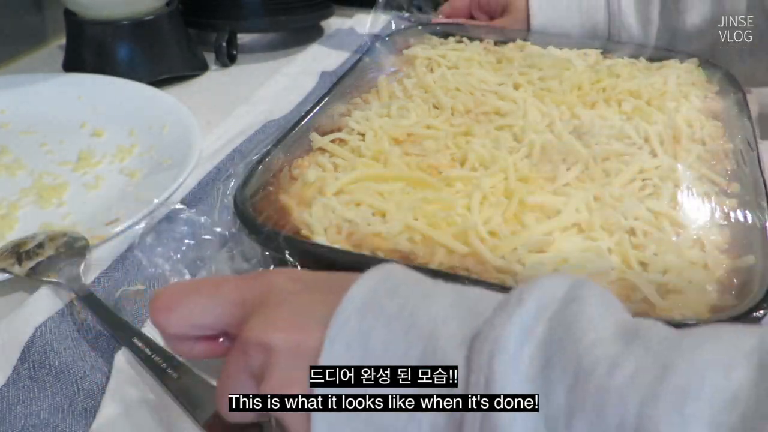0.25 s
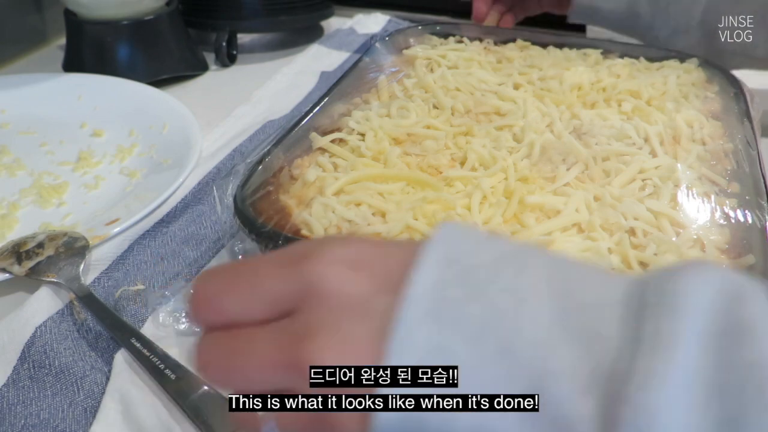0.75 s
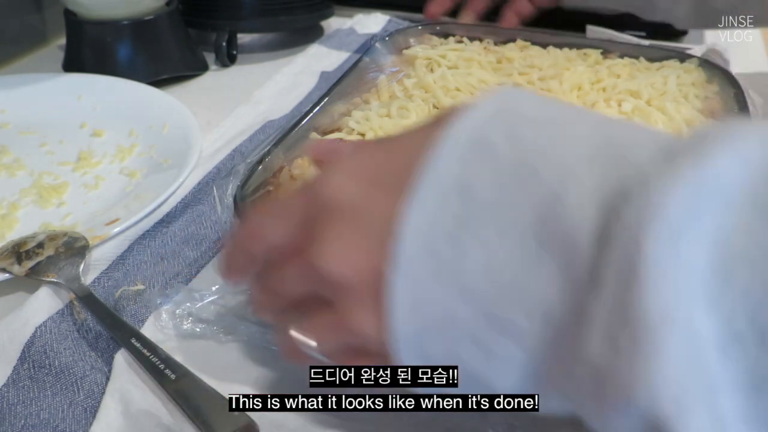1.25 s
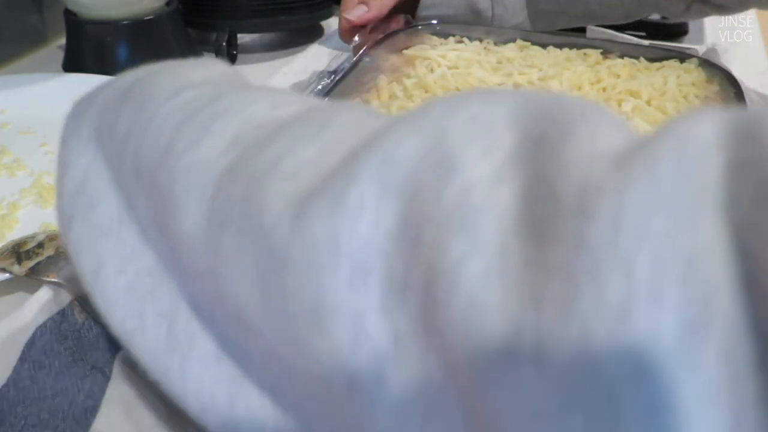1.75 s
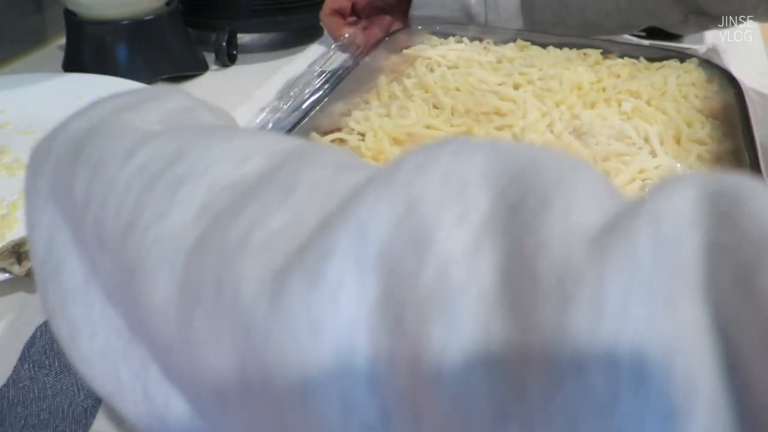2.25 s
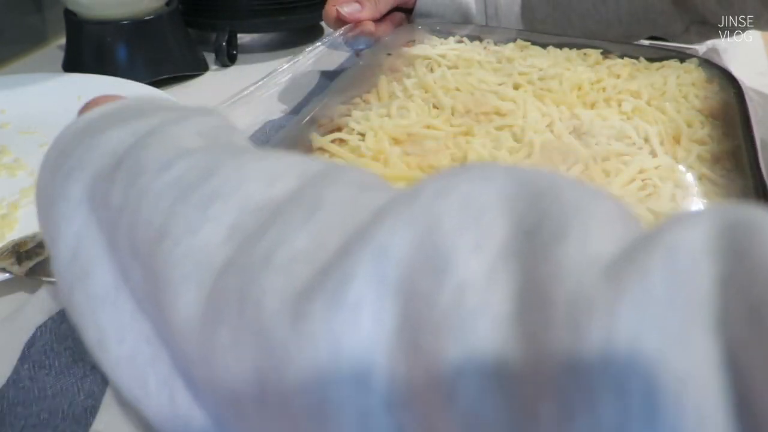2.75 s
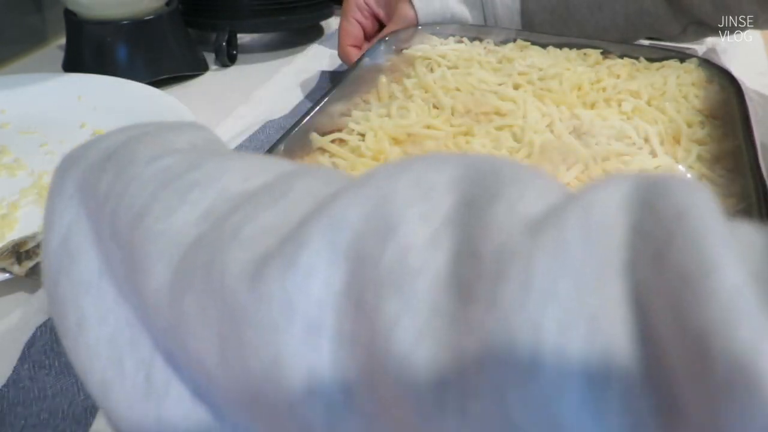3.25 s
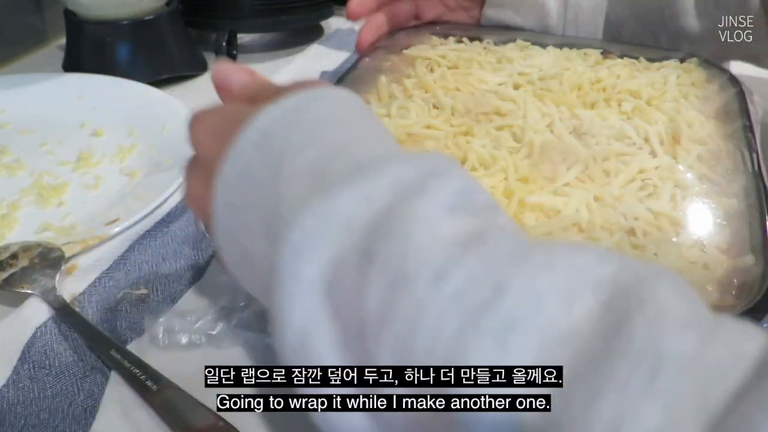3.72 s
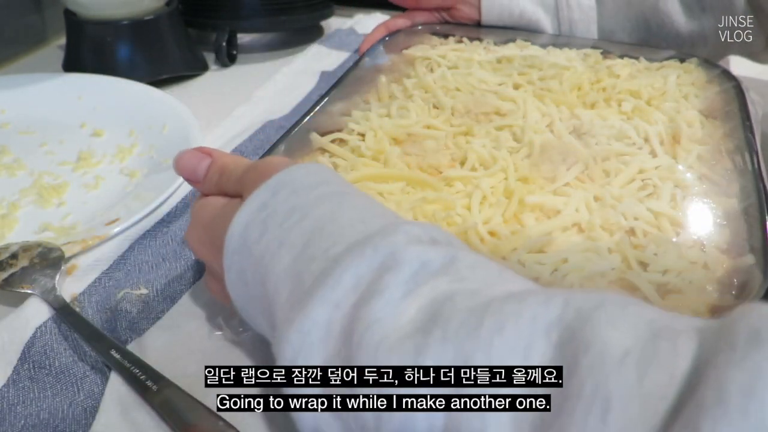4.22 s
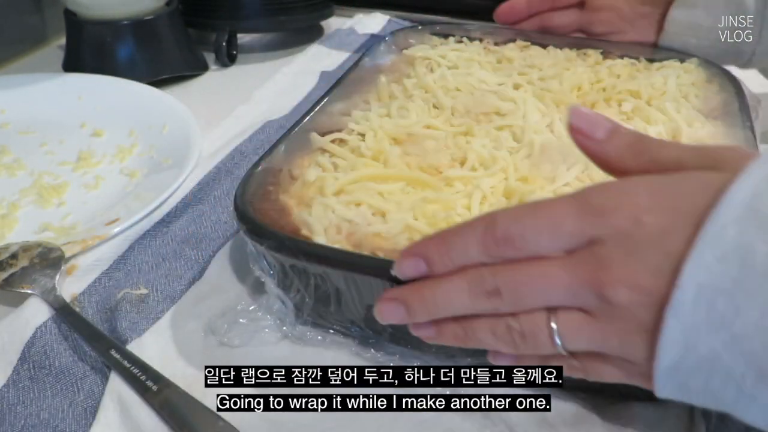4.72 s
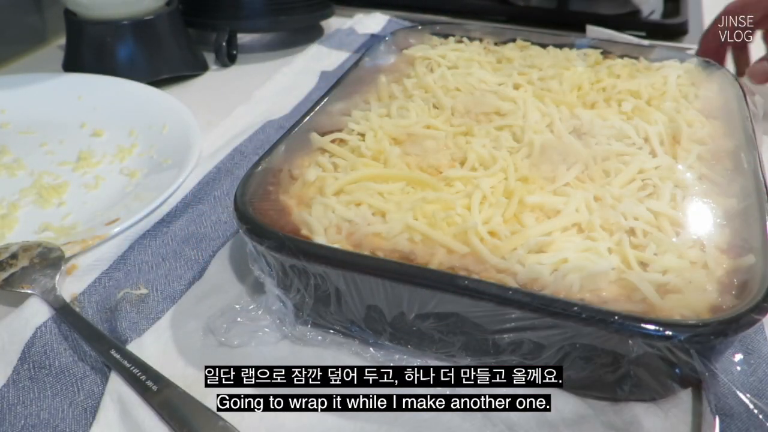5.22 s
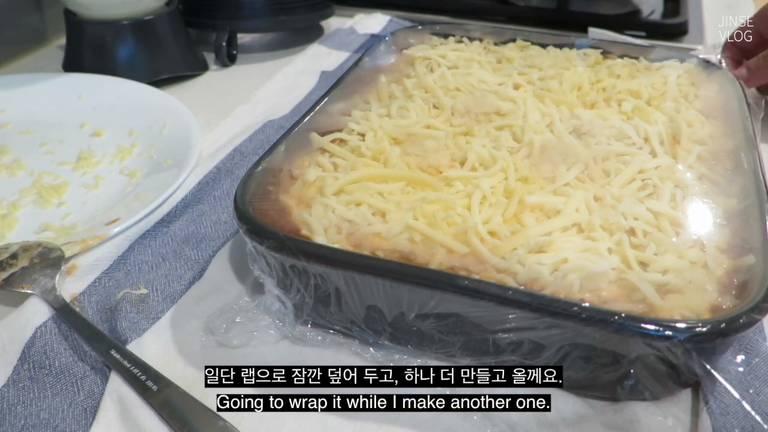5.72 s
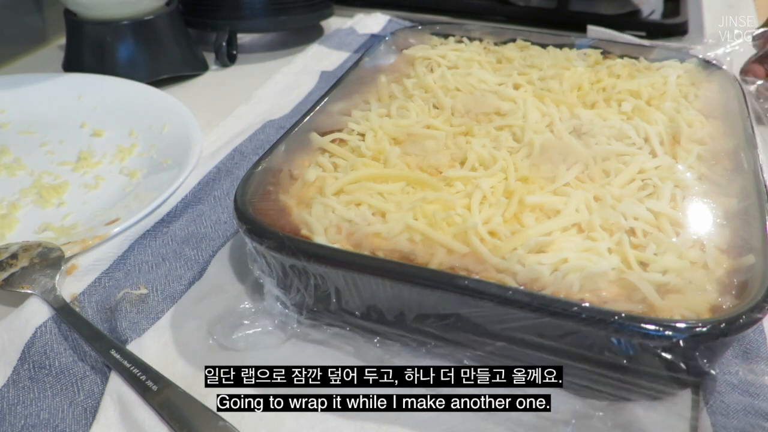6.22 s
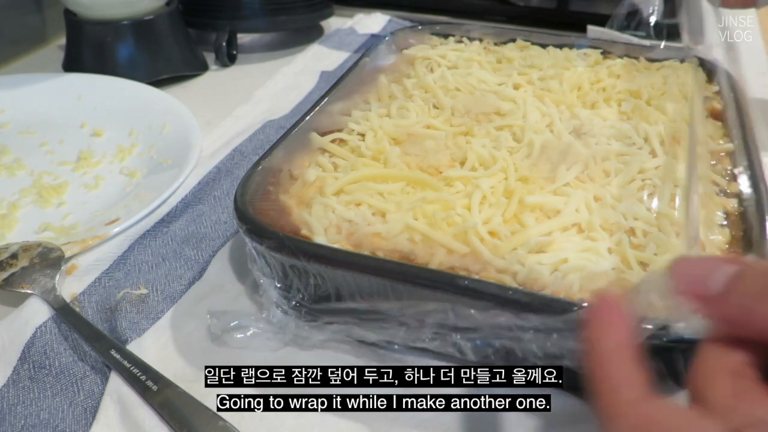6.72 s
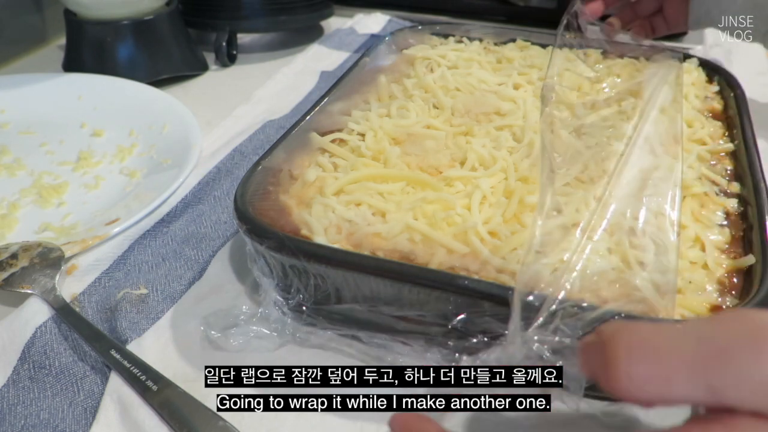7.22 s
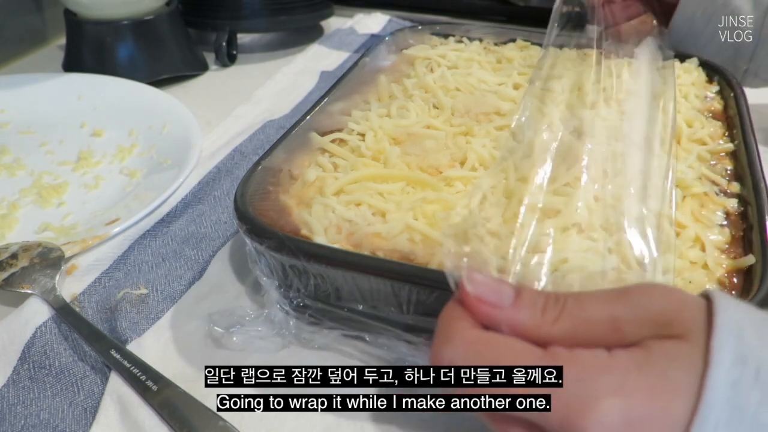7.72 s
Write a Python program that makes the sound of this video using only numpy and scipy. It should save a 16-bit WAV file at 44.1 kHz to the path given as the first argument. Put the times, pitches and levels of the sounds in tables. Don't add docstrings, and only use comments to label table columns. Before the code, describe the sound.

Hands tuck plastic film around a heavy dish, heard very close. Bright single cracks alternate with soft fizzing rustle; fingers tap the rim and palms thump the counter. A violent short tear comes just before the middle, the level dips slightly after it, a thin squeak passes, then calm, scattered crinkles and a final dense burst. Steady room hum and short hard reflections.

```python
import sys
import numpy as np
from scipy import signal
from scipy.fft import rfft, irfft, next_fast_len
from scipy.io import wavfile
from scipy.ndimage import uniform_filter1d, map_coordinates

SR = 44100
rng = np.random.default_rng(int(sys.argv[2]) if len(sys.argv) > 2 else 0)


def put_to_file(sound):
    columns = np.atleast_2d(sound).T
    safe = np.clip(columns, -1, 1)
    whole_steps = np.round(safe * 32767)
    wavfile.write(sys.argv[1], SR, whole_steps.astype(np.int16))


def rack_gain(trim_db):
    fader = np.asarray(trim_db, float)
    return 10 ** (fader / 20)


N = 351477

# t/s, rustle level/dB, coarse patches over fine/dB
FIDGETS = [(0, -59, -13), (.3, -54, 3.5), (.5, -56.5, -2), (.86, -72, 9), (1.2, -58, 0.5), (1.45, -64, 0.5),
           (1.65, -61.5, 1), (2.2, -63, -2), (2.7, -59, 1), (3.3, -66, 2), (3.75, -67, -7),
           (4.35, -59.5, -6), (4.9, -59, -0.5), (5.7, -64.5, 1), (6.5, -57, -0.5), (7.5, -62, -5),
           (7.97, -51, -3)]
# t of peak/s, rustle level/dB, coarse over fine/dB, 10 dB fall/s
GRABS = [(.095, -50.5, -5, 4), (.14, -47, 11, 0.03), (.325, -39.5, -5, -0.16), (1.03, -41.5, -0.5, -0.07),
         (1.85, -47.5, -1.5, 0.07), (1.96, -54, -1, 0.17), (2.29, -48.5, -3.5, 0.06),
         (2.675, -47, -6, 0.08), (2.905, -45, -5, 0.04), (3.01, -51, -4.5, 0.25), (3.4, -50.5, -1, -0.04),
         (3.47, -50, -5, 0.4), (3.86, -46, -5, 0.15), (4.51, -53, -6, 0.16), (5.86, -54.5, -3, 0.15),
         (5.985, -45, -8, 0.15), (6.245, -44, -7, 0.16), (6.285, -48.5, -6, 0.03), (6.632, -45, -6, 0.09),
         (6.7, -52, -4, 0.1), (7.07, -47, -9, 0.04), (7.61, -46, -4.5, 0)]
# t of peak/s, rustle level/dB, coarse over fine/dB, 10 dB fall/s
PULLS = [(.036, -39, -4.5, 0.025), (.005, -42, 2, 0.021), (.6, -41.5, -1.5, 0.032), (.73, -48, -8.5, 0.043),
         (2.06, -41.5, -2.5, 0.024), (2.46, -43, -3, 0.067), (2.59, -46.5, -7, 0.034),
         (2.845, -45.5, -1.5, 0.031), (3.6, -55, 10.5, 0.068), (4.15, -51, -18, 0.075),
         (6.345, -40, -10, 0.042), (6.51, -51, -11, 0.07), (6.85, -47.5, -8, 0.07),
         (7.7, -47.5, -5.5, 0.05), (7.79, -41, -17, 0.04), (7.82, -40.5, -6, .03),
         (7.855, -36.5, -6, 0.016), (7.9, -35.5, -7.5, 0.024), (7.97, -43.5, -8, 0.032)]
# f/Hz, level/dB per Hz
FILM_COLOUR = [(180, -52), (300, -5), (930, -3), (1450, -2.5), (2650, -4), (3700, -3.5), (11500, -5),
               (14200, -10.5), (16000, -21.5)]
# f/Hz, left-right likeness
FILM_LIKENESS = [(60, 0.48), (130, -0.01), (290, 0.44), (640, 0.88), (1410, 0.77), (3100, 0.8),
                 (6820, -0.027), (15000, -0.13)]
# f/Hz, level/dB per Hz
HUM_COLOUR = [(15, -40), (32, -7.5), (87, 3), (185, 2), (301, 0), (394, -4.5), (1160, -6.5), (2550, -10.5),
              (4490, -11), (12200, -28), (14400, -26), (16000, -27)]
# f/Hz, left-right likeness
HUM_LIKENESS = [(60, 0.99), (130, -0.0026), (290, -0.6), (640, -0.6), (1410, 0.13), (3100, 0.29),
                (6820, 0.34), (15000, 0.19)]
# t/s, peak level/dB, patch f/Hz, brightness/dB
SWARM_CREASES = [
    (0.0024, -27, 1800, -5),
    (0.0225, -26, 1170, -7),
    (0.1241, -35, 5230, -7),
    (2.319, -31.5, 1410, -18),
    (2.744, -37.5, 1770, -17),
    (4.5, -35.5, 3570, -21),
    (6.626, -28, 5200, -14),
    (7.8205, -27, 3400, -14),
    (7.843, -24, 3580, -20),
]
# t/s, peak level/dB, patch f/Hz, brightness/dB
TUCK_CREASES = [(0.0327, -22, 9500, -8), (0.0903, -27, 1100, -12), (0.1356, -13.5, 1300, 0),
                (0.1372, -12.5, 5270, -14), (0.2793, -30, 1210, 6), (0.311, -7, 3200, -12),
                (0.3135, -18, 4960, -4), (.329, -25, 4000, -16), (0.4753, -40, 1210, -16),
                (0.5614, -45, 1970, -11), (0.5819, -16.5, 2100, -17), (1.0075, -29, 2240, -13),
                (1.133, -32, 3100, -16), (1.147, -34, 4500, -8), (1.163, -36, 2950, -18),
                (1.18, -37, 4500, -12), (1.7853, -40.5, 1430, -26), (1.8212, -33, 1820, -14),
                (1.9349, -39, 1680, -7), (2.0382, -31, 2840, -7), (2.0506, -25, 9000, -4),
                (2.064, -22.5, 1070, -16), (2.3765, -24, 4070, -18), (2.443, -27, 1260, -2),
                (2.5947, -29, 2810, -6), (2.8045, -34, 5500, -14), (2.8335, -27, 1070, -4),
                (2.839, -26, 3430, -14), (2.9655, -26.5, 3480, -21), (3.0, -32, 2000, -7),
                (3.0135, -28, 2980, -7), (3.02, -31, 7500, -14), (3.0833, -26, 4430, -14),
                (3.457, -11, 1270, -14)]
# t/s, peak level/dB, patch f/Hz, brightness/dB
TAUT_CREASES = [(0.3178, -18, 9000, -2), (0.5521, -40, 1890, -15), (0.6975, -17, 2800, -12),
                (.7055, -29, 6000, -22), (0.7258, -6.5, 3640, -17), (0.7333, -35, 6000, -12),
                (1.0176, -15, 3570, -11), (2.0064, -31, 1190, -11), (2.2683, -23, 1870, -9),
                (2.2821, -20, 1240, -14), (2.2845, -22, 4500, -16), (2.4219, -21, 4270, -3),
                (2.4525, -21, 1930, -13), (2.47, -6, 8250, -16), (2.5646, -28, 2830, -19),
                (2.6603, -19.5, 5200, -9), (3.228, -32.5, 1250, -1), (2.6439, -34.5, 1850, -20),
                (2.8954, -15, 2360, -26), (5.9879, -30, 4200, -10), (6.007, -28, 3500, -13),
                (6.0557, -35, 4190, -10), (6.337, -12, 3000, -19.5), (6.3604, -22, 2900, -16),
                (6.7626, -36, 8000, -8), (7.697, -36, 1500, -7), (7.712, -27, 5500, -10),
                (7.726, -27, 4000, 0), (7.7519, -21, 5840, 2), (7.959, -33, 6000, -8)]
# t/s, peak level/dB, patch f/Hz, brightness/dB
TEAR_CREASES = [
    (3.4958, -33, 2460, -10),
    (3.513, -16, 8750, -8),
    (3.518, -17, 2600, -5),
    (3.5205, -22, 7500, -9),
    (3.5485, -13, 4100, -11),
    (3.556, -21, 10300, -8),
    (3.5745, -16, 9000, -8),
    (3.5785, -11, 5000, -3),
    (3.5825, -13.5, 4380, -18),
    (3.597, -24, 6500, -10),
]
# t/s, peak level/dB, patch f/Hz, brightness/dB
PEEL_CREASES = [(3.8328, -35, 2590, -25), (3.8448, -25, 1830, -18), (3.8727, -22, 2540, -10),
                (4.3796, -38, 1160, -11), (4.845, -26.5, 2500, -23.5), (4.87, -43, 3000, -23),
                (5.8472, -39.5, 1330, -8), (6.1907, -30, 1430, -16), (6.2299, -37, 2770, -20),
                (6.283, -31, 3400, -14), (6.3215, -25, 3300, -27), (6.3449, -23, 3500, -23),
                (6.4935, -33, 3500, -7), (6.5057, -25.5, 2000, -9.5), (6.9384, -37, 7820, 4),
                (7.074, -38, 7140, -10), (7.5264, -38, 2440, -2), (7.5643, -41, 3550, -4),
                (7.6157, -31, 5910, -13), (7.7778, -27, 3710, -10.5), (7.8821, -25, 2920, -5),
                (7.889, -28, 4000, -8), (7.8962, -18, 2950, -17)]
# f/Hz, level/dB
CRACK_COLOUR = [(150, -36), (500, -5.5), (1200, -3.5), (3000, -3.5), (8000, -2.5), (11000, 0),
                (14000, -7.5), (16500, -7)]
# f/Hz, level/dB per Hz
TAUT_COLOUR = [(180, -49), (400, -20.5), (1000, -12.5), (1900, -8.5), (4020, -5.5), (8640, -9),
               (15200, -28), (16000, -47)]
# delay t/s, level/dB
WALL_ECHOES = [(.0012, -28), (.0035, -12), (.0078, -7.5), (.013, -8), (.021, -13)]
# f/Hz, t60/s
KITCHEN_T60 = [(200, 1), (1000, 0.54), (4000, 0.52), (12000, 0.35)]
# t/s, peak level/dB, pitch f/Hz, t60/s
RIM_TAPS = [(0.092, -39, 1104, 0.05), (0.14, -24.5, 840, 0.015), (0.3115, -14, 1367, 0.025),
            (.318, -31, 1250, .03), (1.018, -36, 915, 0.025), (2.283, -44, 1180, 0.024),
            (2.445, -38, 1190, 0.019), (2.4695, -26.5, 1230, 0.007), (2.834, -37, 970, 0.034),
            (4.845, -43, 1100, 0.054), (6.684, -45, 1170, 0.044)]
# t/s, peak level/dB, pitch f/Hz, t60/s
FINGER_KNOCKS = [(0.14, -29.5, 313, 0.038), (0.263, -37.5, 340, 0.033), (0.31, -32.5, 673, 0.026),
                 (0.9, -36.5, 357, 0.029), (0.998, -37.5, 385, 0.081), (2.452, -34, 380, 0.022),
                 (2.74, -46, 750, 0.03), (2.8965, -33.5, 365, 0.019), (2.966, -39.5, 348, 0.033),
                 (3.011, -43.5, 826, 0.039), (3.4575, -21.5, 860, 0.01), (3.842, -40, 824, 0.049)]
# t/s, peak level/dB, pitch f/Hz, t60/s
MORE_KNOCKS = [
    (0.999, -30.5, 382, 0.066),
    (2.069, -45, 340, 0.029),
    (3.457, -44, 368, 0.028),
    (3.515, -45, 186, 0.04),
    (7.841, -44, 145, 0.052),
]
# t/s, level/dB, pitch f/Hz, 10 dB fall/s
LOOSE_PATCHES = [(.318, -38, 1330, -0.3), (.33, -38, 1250, -0.2), (.357, -39.5, 1290, .03),
                 (.385, -41, 1550, -0.3), (.45, -54, 1290, -0.9), (1.855, -49, 1880, -0.3),
                 (2.29, -47, 1260, .02), (2.313, -40, 1330, -0.1), (2.382, -50, 890, -0.2),
                 (2.405, -49, 1040, .005), (2.745, -46, 970, -0.04), (2.862, -41, 900, -0.22),
                 (3.503, -35, 2430, .006), (3.514, -32, 2150, 0.04), (3.532, -39, 2270, -0.8),
                 (3.585, -32.5, 780, -0.35), (6.674, -51, 1100, .006), (6.684, -44, 1410, -0.15),
                 (6.7, -50, 1900, -0.5), (7.826, -43, 1120, -0.05), (7.847, -44, 1590, .01),
                 (7.847, -51, 3600, .005), (7.88, -42, 3300, -0.2)]
# t/s, level/dB, 10 dB fall/s
DISH_SHIFTS = [
    (.92, -48, 0.06),
    (1.02, -53.5, 0.3),
    (1.2, -57, .02),
    (1.33, -54, 0.3),
    (1.96, -53, 0.1),
    (2.33, -63, 0.2),
]
# f/Hz, width f/Hz, level/dB
DISH_SEAT = [(195, 25, -4), (382, 73, -1), (450, 58, -14)]
# t/s, level/dB
RIP_LEVEL = [
    (3.485, -68),
    (3.499, -36),
    (3.52, -33.5),
    (3.545, -27.5),
    (3.585, -27.5),
    (3.61, -35.5),
    (3.66, -46),
    (3.72, -52),
]
# t/s, peak level/dB, pitch f/Hz, t60/s
RIP_PINGS = [(3.497, -36, 3570, .02), (3.5, -34, 2520, .02), (3.5125, -19.5, 5600, 0.032),
             (3.519, -29, 10200, .012), (3.531, -34, 8150, 0.024), (3.549, -9, 4130, 0.014),
             (3.549, -15, 6750, 0.0091), (3.549, -17, 8750, .014), (3.552, -12.5, 5600, .012),
             (3.5495, -24, 3040, .012), (3.556, -13.5, 4200, 0.014), (3.556, -24, 10200, 0.016),
             (3.5755, -19, 6700, .02), (3.578, -20, 1780, 0.021), (3.579, -20, 5300, .02),
             (3.459, -30, 5630, .015), (3.597, -27, 6200, .012), (3.606, -36, 4100, .03),
             (3.606, -41, 5950, .03)]
# t/s, peak level/dB, pitch f/Hz, t60/s
EDGE_SQUEAK = [
    (4.142, -46.5, 4370, 0.11),
]


def unit(x):
    return x / np.sqrt(np.mean(x ** 2) + 1e-20)


def along(points, hz):
    f, v = np.transpose(points)
    return np.interp(np.log(hz + 1), np.log(f + 1), v)


def filtered(x, response):
    m = next_fast_len(x.shape[-1] + 1024)
    return irfft(rfft(x, m) * response(np.fft.rfftfreq(m, 1 / SR)), m)[..., :x.shape[-1]]


def resonance(f, centre, width):
    return 1j * f * width / (centre * centre - f * f + 1j * f * width)


def wobble(rate):
    return map_coordinates(rng.standard_normal(int(N * rate / SR) + 4), [np.arange(N) * rate / SR])


def spread(pair, alike):
    def side_gain(hz):
        return np.tan(np.arccos(np.clip(along(alike, hz), -.9, 1)) / 2)

    side = filtered(pair[1], side_gain)
    return np.array([pair[0] + side, pair[0] - side])


def placed(rows, starts):
    at = np.round(np.asarray(starts) * SR).astype(int)[:, None] + np.arange(rows.shape[1])
    return np.bincount(np.clip(at, 0, None).ravel(), (rows * (at >= 0)).ravel(), N + SR)[:N]


def crackle(shape, spiky_db):
    return rng.standard_normal(shape) * rack_gain(spiky_db * np.minimum(rng.exponential(size=shape), 5))


def swells(s, level_db, fall, rise):
    knots = np.arange(0, N + 64, 64)
    late = (knots / SR - s[:, None]) / np.clip(fall, .01, 1)[:, None]
    power = np.sum(rack_gain(2 * (level_db[:, None] - 10 * np.maximum(late, -late / rise))), 0)
    return np.interp(np.arange(N), knots, power)


def hands():
    s, db, coarse_db = np.transpose(FIDGETS)
    t = np.arange(N) / SR
    fine = rack_gain(2 * np.interp(t, s, db))
    coarse = rack_gain(2 * np.interp(t, s, db + coarse_db))
    for rows, rise in ((GRABS, 0.31), (PULLS, 1.53)):
        at, peak_db, over_db, fall = np.transpose(rows)
        fine = fine + swells(at, peak_db, fall, rise)
        coarse = coarse + swells(at, peak_db + over_db, fall, rise)
    return np.sqrt(fine), np.sqrt(coarse)


def rustle():
    fine, coarse = hands()
    clumps = rack_gain(0.72 * wobble(35) + 0.84 * wobble(160))
    clicks = filtered(crackle((2, N), spiky_db=3.0), lambda hz: rack_gain(along(FILM_COLOUR, hz)))
    low = filtered(clicks, lambda hz: 1 / (1 + (hz / 3200) ** 4))
    fizz = fine * unit(clicks - low)
    body = coarse * rack_gain(0.17) * unit(low)
    return spread(clumps * (fizz + body), FILM_LIKENESS)


def air():
    noise = unit(filtered(rng.standard_normal((2, N)), lambda hz: rack_gain(along(HUM_COLOUR, hz))))
    return rack_gain(-53.5 + 0.56 * wobble(2.7)) * spread(noise, HUM_LIKENESS)


def snaps(creases, spectrum, t60, first_db):
    s, peak_db, patch_hz, bright_db = np.transpose(creases)[:, :, None]
    t60 = t60 * rack_gain(-0.24 * (peak_db + 15))
    lead, index = 64, np.arange(2600)
    age = np.clip(index / SR - lead / SR, 0, None)
    rise = 0.0005 * rack_gain(-first_db)
    spray = unit(crackle((len(s), 2, len(index)), spiky_db=2.0)).swapaxes(0, 1)
    spray = spray * rack_gain(-60 * age / np.clip(t60, .002, .15)) * (1 - np.exp(-age / rise))
    flip = (index == lead) - 0.3 * (index == lead + 3)
    crack = 4 * rack_gain(1.42 * first_db + 0.25 * (peak_db + 25.0)) * flip
    place = rng.standard_normal(s.shape) * np.array([1, -1])[:, None, None]

    def colour(f):
        lift_db = 1.05 * (bright_db + 13.5) / (1 + (6500 / (f + 1)) ** 3)
        tilt = rack_gain(along(spectrum, f) + lift_db)
        small = 1j * f / (0.14 * np.minimum(patch_hz, 4000) + 1j * f)
        return tilt * small ** 2 * (0.73 + resonance(f, patch_hz, .3 * patch_hz))

    def ports(f):
        return rack_gain(0.38 * place) * np.exp(1j * np.pi * f * 2.5e-5 * place)

    def unlike(hz):
        return np.sqrt(np.clip(1 - along(FILM_LIKENESS, hz), 0, 2))

    near = filtered(crack + spray[0], lambda f: colour(f) * ports(f))
    scattered = filtered(spray[1], colour)
    gain = rack_gain(peak_db) / np.abs(near.mean(0)).max(1, keepdims=True)
    start = s[:, 0] + .0014 - lead / SR
    apart = filtered(placed(gain * scattered, start), unlike)
    return np.array([placed(gain * row, start) for row in near]) + rack_gain(-3.5) * apart * [[1], [-1]]


def creases():
    swarms = snaps(SWARM_CREASES, CRACK_COLOUR, t60=0.046, first_db=-1)
    tucks = snaps(TUCK_CREASES, CRACK_COLOUR, t60=0.041, first_db=1.05)
    taut = snaps(TAUT_CREASES, CRACK_COLOUR, t60=0.037, first_db=4.1)
    tear = snaps(TEAR_CREASES, TAUT_COLOUR, t60=0.023, first_db=-11)
    peel = snaps(PEEL_CREASES, CRACK_COLOUR, t60=0.03, first_db=1)
    return swarms + tucks + taut + tear + peel


def kitchen(x, early_db, late_db):
    early = np.array([sum(rack_gain(db) * np.roll(x, int(s * skew * SR)) for s, db in WALL_ECHOES)
                      for skew in (.97, 1.04)])
    late, hop = np.zeros((2, N + 2 * SR)), SR // 3
    hz, t, z = signal.stft(rng.standard_normal((N // hop + 1, 2, SR // 2)), SR, nperseg=256)
    decay = rack_gain(-60 * t / along(KITCHEN_T60, hz)[:, None])
    tails = signal.istft(z * decay, SR, nperseg=256)[1]
    tails = tails / np.linalg.norm(tails[0, 0])
    for a, tail in zip(range(0, N, hop), tails):
        part = signal.fftconvolve(x[None, a:a + hop], tail, axes=1)
        late[:, a + 200:a + 200 + part.shape[1]] += part
    return rack_gain(early_db) * early + rack_gain(late_db) * spread(late[:, :N], FILM_LIKENESS)


def ringing(taps, ratios, levels_db, attack, scatter):
    s, peak_db, hz, t60 = np.transpose(taps)[:, :, None]
    t = np.arange(SR // 3) / SR
    chance = rng.standard_normal((len(s), 2 * len(ratios)))
    ring = 0
    for k, (ratio, db) in enumerate(zip(ratios, levels_db)):
        mode_hz = hz * ratio * (1 + scatter * chance[:, [2 * k + 1]])
        ring = ring + rack_gain(db + 2 * chance[:, [2 * k]]) * np.sin(2 * np.pi * mode_hz * t)
    ring = ring * rack_gain(-60 * t / np.clip(t60, .008, .7)) * (1 - np.exp(-t / attack))
    return placed(rack_gain(peak_db) * ring / np.abs(ring).max(1, keepdims=True), s[:, 0])


def rim():
    return ringing(RIM_TAPS, (0.983, 0.98, 1.9, 0.98, 1.134, 1.0), (7.0, 23, 3.0, -11, 8, -12),
                   attack=0.0002, scatter=0.022)


def knocks():
    return ringing(FINGER_KNOCKS + MORE_KNOCKS, (0.99, 0.44, 1.196, 1.66, 0.68),
                   (7.5, -5.5, -0.5, -8.5, -4.0), attack=0.002, scatter=0.028)


def blooms():
    s, level_db, hz, fall = np.transpose(LOOSE_PATCHES)[:, :, None]
    fall, lead = np.clip(fall, .004, .15), 2000
    late = (np.arange(SR // 3) - lead) / SR / fall
    noise = filtered(rng.standard_normal((2, *late.shape)), lambda f: resonance(f, hz, hz / 3.2) ** 2)
    swell = rack_gain(level_db - 10 * np.maximum(late, -late / 0.14))
    noise = noise / noise.std(2, keepdims=True) * swell
    return spread(np.array([placed(rows, s[:, 0] - lead / SR) for rows in noise]), FILM_LIKENESS)


def slide():
    def seat(f):
        return sum(rack_gain(db) * resonance(f, centre, width) for centre, width, db in DISH_SEAT)

    gain = np.sqrt(swells(*np.transpose(DISH_SHIFTS), rise=0.13))
    scrape = unit(filtered(rng.standard_normal(N), lambda f: seat(f) ** 2))
    return gain * rack_gain(-2.0 + 0.98 * wobble(18.7)) * scrape


def patchy(x, depth_db):
    z = signal.stft(x, nperseg=128)[2]
    field = uniform_filter1d(rng.standard_normal(z.shape[1:]), size=3, axis=0)
    field = uniform_filter1d(field, size=9, axis=1)
    return signal.istft(z * rack_gain(depth_db * unit(field)), nperseg=128)[1][:, :N]


def rip():
    s, level_db = np.transpose(RIP_LEVEL)
    level_db = np.interp(np.arange(N) / SR, s, level_db, -120, -120)
    clicks = filtered(crackle((2, N), spiky_db=1.0), lambda hz: rack_gain(along(TAUT_COLOUR, hz)))
    clicks = unit(patchy(clicks, depth_db=2.4))
    return spread(rack_gain(level_db + 2.0 + 0.84 * wobble(220) + 0.8 * wobble(70)) * clicks, FILM_LIKENESS)


def pings():
    return ringing(RIP_PINGS, (1, .96, 1.045), (0, -5, -5), attack=0.0013, scatter=0.013)


def squeak():
    return ringing(EDGE_SQUEAK, (1, 1.01, .86), (0, -6, -9), attack=0.01, scatter=0.003)


def scene():
    film = creases() + blooms()
    glass = rim() + knocks() + pings() + squeak()
    room = kitchen(film.mean(0) + glass, early_db=-11.0, late_db=-12)
    return rustle() + air() + film + glass + slide() + rip() + room


def release(over, fall):
    ramp = fall * np.arange(len(over))
    return np.maximum.accumulate(over + ramp) - ramp


def band_limit(x):
    return signal.sosfilt(signal.butter(12, 16680, fs=SR, output="sos"), x)


def record(dry):
    level_db = 10 * np.log10(np.abs(uniform_filter1d(np.mean(dry ** 2, 0), size=1800)) + 1e-12)
    duck_db = release(0.5 * np.clip(level_db + 34, 0, None), 14 / SR)
    duck_db = uniform_filter1d(np.roll(duck_db, 2200), size=1800)
    limited = filtered(dry * rack_gain(-duck_db), lambda hz: hz < 15980)
    return band_limit(limited)


dry = scene()
out = record(dry)
put_to_file(out)
```